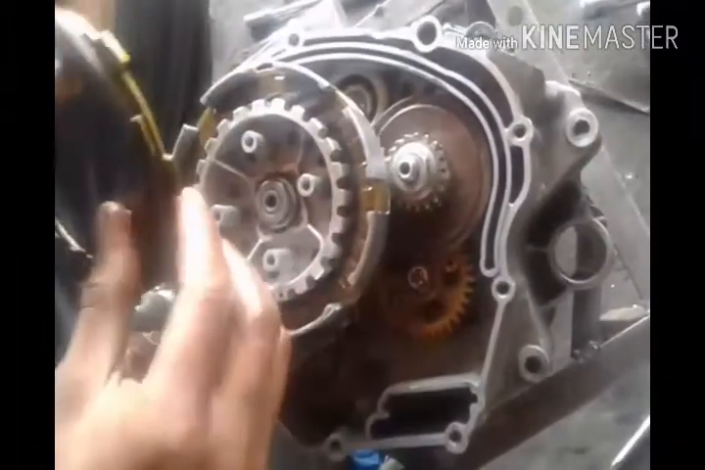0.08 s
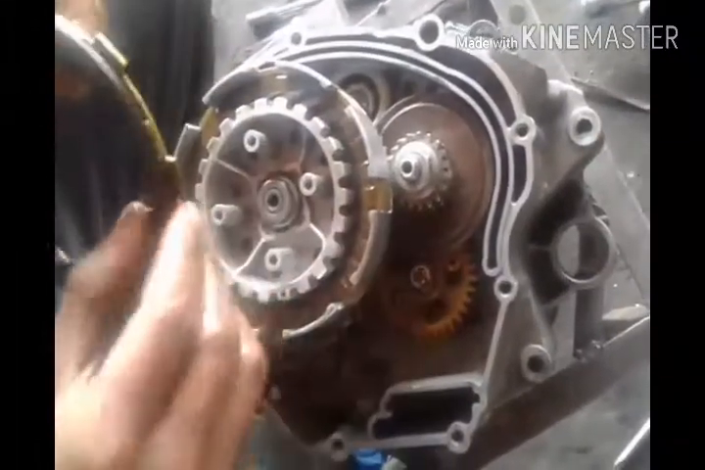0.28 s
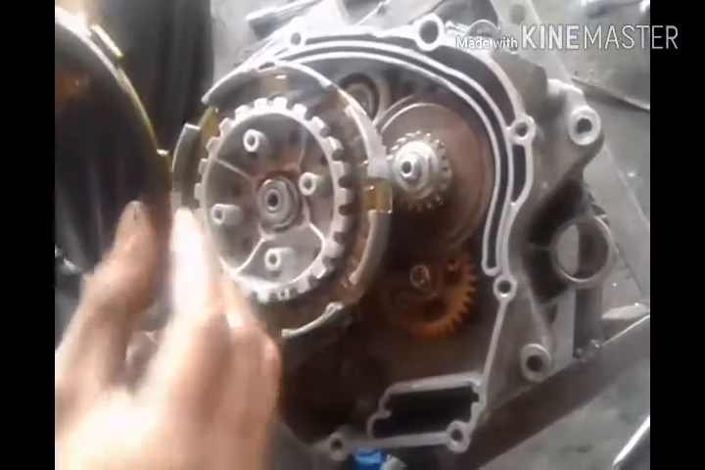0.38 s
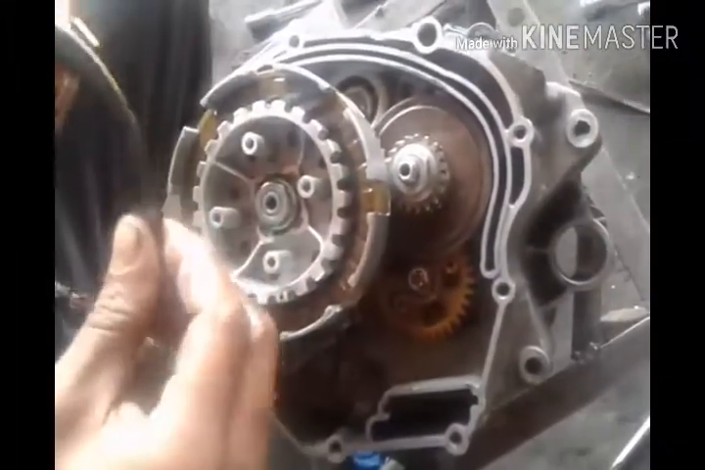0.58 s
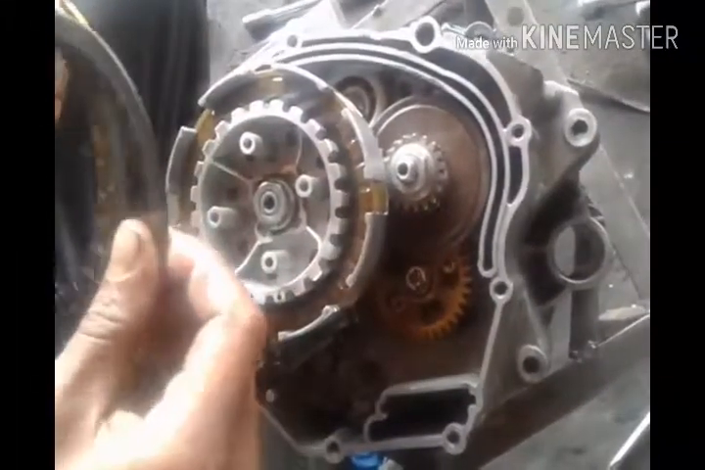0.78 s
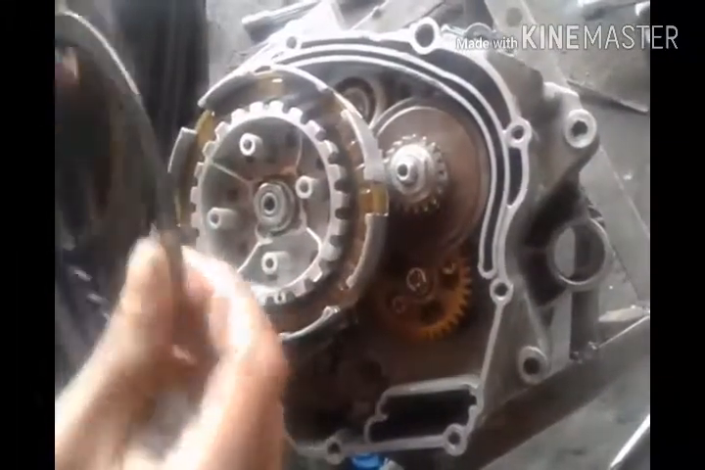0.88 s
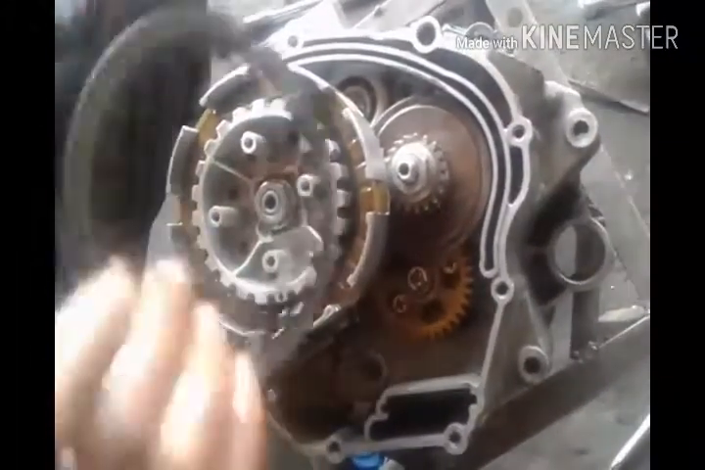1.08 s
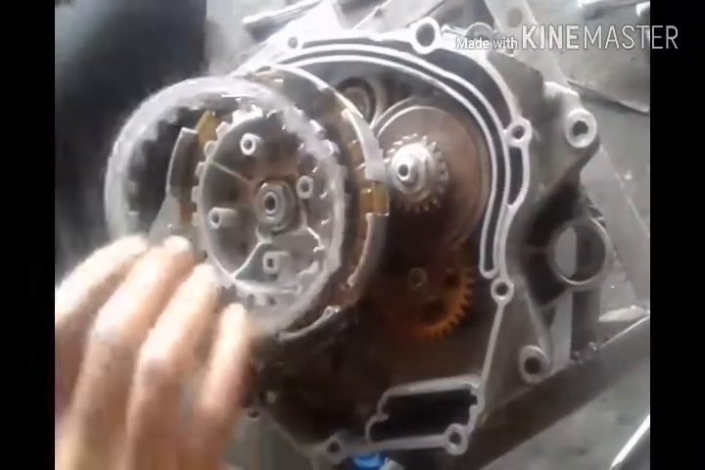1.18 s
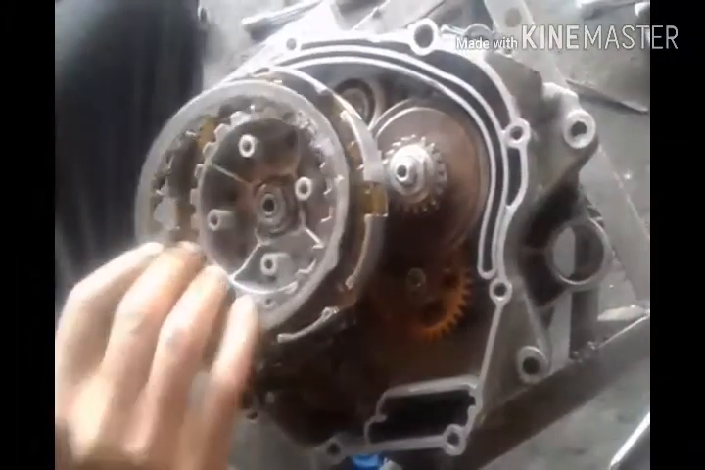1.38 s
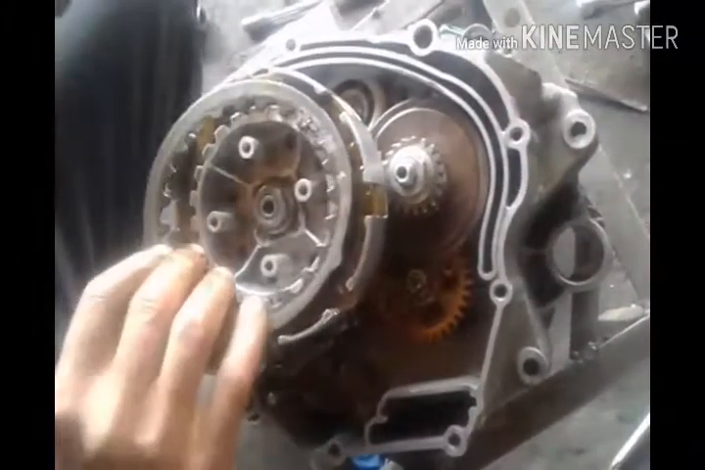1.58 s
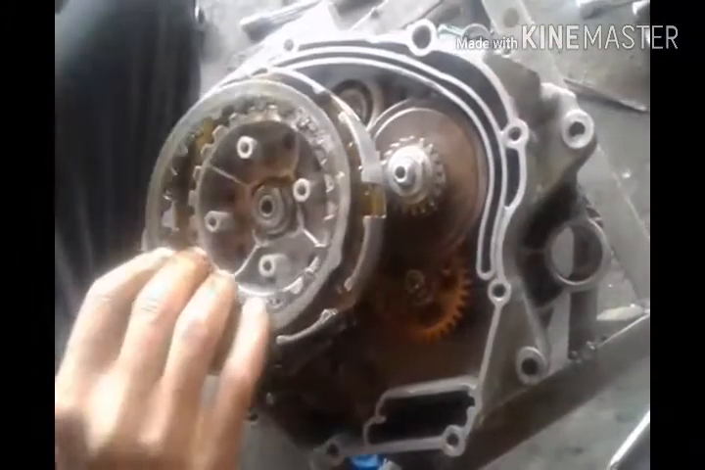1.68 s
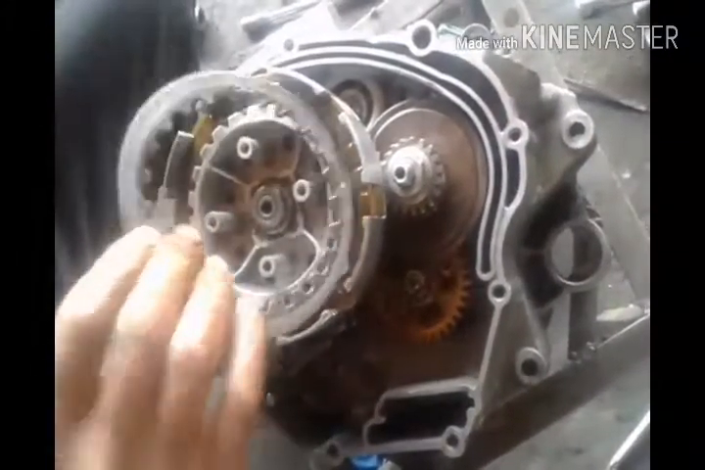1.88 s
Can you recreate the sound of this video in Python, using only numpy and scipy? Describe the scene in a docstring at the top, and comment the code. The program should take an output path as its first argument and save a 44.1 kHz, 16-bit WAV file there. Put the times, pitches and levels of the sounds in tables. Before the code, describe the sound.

Steel plates clink sharply three times and ring briefly in a hard workshop with engine-like rumble

```python
"""A low rumble with engine-like tones is heard first, under a soft hiss of sliding, in a hard-walled workshop.
In front of it steel clutch plates are handled and slid onto an engine: three bright clinks ring on in the room,
with lighter rebounds after them; a faint squeak leads into the last. Rumble, hiss and scuffs are coloured noise;
engine tones, drones, squeak and plate ring are sines; contacts are noise bursts coloured by a click and
followed by dense reflections. At the microphone a gain control ducks loud moments."""
import sys
import numpy as np
from scipy import signal
from scipy.fft import rfft, irfft
from scipy.io import wavfile
from scipy.ndimage import uniform_filter1d

SR = 44100
rng = np.random.default_rng(int(sys.argv[2]) if len(sys.argv) > 2 else 0)


def dump_mix(stems):
    """Bounce the given channels to the path in sys.argv[1] as a 16-bit WAV at rate SR."""
    frames = np.atleast_2d(stems).T  # one column per channel
    limited = np.clip(frames, -1, 1)  # hard clip at full scale
    pcm = np.round(limited * 32767).astype(np.int16)
    wavfile.write(sys.argv[1], SR, pcm)


N = 85995
T = np.arange(N) / SR   # time [s]


def from_db(db):
    """Convert decibels to an amplitude gain."""
    return 10 ** (np.asarray(db) / 20)


def rms_one(x):
    """Scale to unit rms."""
    return x / np.sqrt(np.mean(x ** 2) + 1e-20)


def in_time(rows):
    """Join the rows of a curve by straight lines, one array per column after the time."""
    times_s, *columns = np.transpose(rows)
    return [np.interp(T, times_s, column) for column in columns]


def at_hz(points, hz):
    """Read a spectrum between its points on a log-frequency axis."""
    point_hz, value = np.transpose(points)
    return np.interp(np.log(np.maximum(hz, 1)), np.log(point_hz), value)


def drift(rate_hz):
    """Smooth random wandering of unit rms: white noise through two equal one-pole low-passes."""
    pole = np.exp(-2 * np.pi * rate_hz / SR)
    wander = signal.lfilter([1], [1, -2 * pole, pole * pole], rng.standard_normal(2 * N))
    return rms_one(wander[N:])   # the first half lets the filter settle


def noise(spectrum):
    """Noise of unit rms, coloured by a spectrum."""
    hz = np.fft.rfftfreq(N, 1 / SR)
    white = rfft(rng.standard_normal(N))
    return rms_one(irfft(white * from_db(at_hz(spectrum, hz)), N))


def tone(hz, jitter, waver_db, rate):
    """A sine of about unit rms whose pitch and level waver; jitter is a fraction of the pitch."""
    turns = np.cumsum(hz * (1 + jitter * drift(rate))) / SR + rng.random()
    return np.sqrt(2) * np.sin(2 * np.pi * turns) * from_db(waver_db * drift(rate))


# The engine-like background, before trims:
# (time [s], noise level [dB], firing rate [Hz], level of the tones [dB])
ENGINE_SWELL = [(0, -41, 42.8, -42), (.25, -34, 42.3, -33.5), (.45, -29, 41.74, -28),
                (.57, -26.5, 41.9, -23), (.665, -27, 41.68, -23.5), (.695, -34.5, 41.1, -32),
                (.84, -31.5, 41.76, -28), (.97, -34, 41.58, -32), (1.1, -33, 40.55, -39.5),
                (1.5, -36.5, 39.77, -39.5), (1.95, -35.5, 39, -46)]
# Its tones: (multiple of the firing rate, level [dB])
ENGINE_ORDERS = [(2, -5.5), (3, -13), (4, -15), (5, -14), (7, -13)]
# Colours of the low rumble, the growl above it and the airy rush: (frequency [Hz], relative level [dB per Hz])
RUMBLE_COLOUR = [(28, -38), (48, -19), (66, -1), (100, 0.5), (135, 4.5), (200, -0.5), (260, -8), (400, -25),
                 (800, -67), (3000, -77)]
GROWL_COLOUR = [(120, -42), (210, -4.5), (270, 1.5), (330, -3.5), (430, -11), (700, -16.5), (1500, -43),
                (5000, -60.5)]
RUSH_COLOUR = [(300, -3), (550, -1.5), (800, -1), (1300, -1), (1900, -3.5), (2400, -17.5), (4000, -17.5),
               (7000, -35), (10000, -69)]


def rumble():
    """Engine-like tones sag in pitch as their rumble and rush swell, then recede and grow duller."""
    rumble_trim_db, growl_trim_db, growl_fade_db_per_s = -4, -2.5, 2.5
    rush_peak_db, rush_follows = -34.5, 0.95   # dB of rush per dB of swell
    level_db, firing_hz, tones_db = in_time(ENGINE_SWELL)
    swell_db = level_db - level_db.max()
    tones = sum(from_db(order_db) * tone(round(order) * firing_hz, jitter=0.004, waver_db=1.5, rate=4.55)
                for order, order_db in ENGINE_ORDERS)
    low = from_db(level_db + rumble_trim_db) * noise(RUMBLE_COLOUR)
    growl = from_db(level_db + growl_trim_db - growl_fade_db_per_s * T) * noise(GROWL_COLOUR)
    rush = from_db(rush_peak_db + rush_follows * swell_db) * noise(RUSH_COLOUR)
    return from_db(tones_db) * tones + low + growl + rush


# Low droning tones: (start [s], end [s], start pitch [Hz], end pitch [Hz], level at the middle [dB])
DRONE_TONES = [(.02, .62, 404, 399, -42), (0, .62, 296, 292, -39), (.3, 1.4, 355, 345, -41),
               (.9, 1.75, 173, 168, -41)]


def drones():
    """Low wavering tones in the background fade in, sink a little and fade out."""
    out = 0
    for start_s, end_s, start_hz, end_hz, db in DRONE_TONES:
        part = np.clip((T - start_s) / (end_s - start_s), 0, 1)
        hz = start_hz + (end_hz - start_hz) * part
        fade = np.sin(np.pi * part)
        out = out + from_db(db) * fade * tone(hz, jitter=0.003, waver_db=3.5, rate=5.7)
    return out


# The sliding hiss: (time [s], level [dB])
HISS_LEVEL = [(0, -46), (.12, -43), (.278, -40.5), (.296, -32.5), (.34, -34), (.395, -38.5), (.44, -33),
              (.51, -37), (.65, -31.5), (.695, -43.5), (.87, -39), (.925, -38.5), (1.02, -42), (1.09, -36),
              (1.13, -47.5), (1.33, -45), (1.41, -43), (1.95, -43.5)]
# Colours of the hiss and of the scuffs: (frequency [Hz], relative level [dB per Hz])
HISS_COLOUR = [(1500, -8), (2400, -9), (3200, -3.5), (4200, 1.5), (5200, -7), (6500, -16.5), (8000, -21.5),
               (9300, -47.5), (12000, -64)]
SCUFF_COLOUR = [(300, -11), (600, -3), (1200, -8), (1900, 4), (2600, -13), (4000, 9.5), (6500, -16),
                (11000, -63)]
# The plate scuffs against the hub as it seats: (time of the middle [s], level [dB], half length [s])
HUB_SCUFFS = [(0.947, -40.5, 0.042), (1.164, -29.5, 0.02)]
# The thin squeak: (time [s], level [dB], pitch [Hz])
SQUEAK_GLIDE = [(1.41, -56, 4130), (1.445, -45, 4090), (1.48, -40, 4050), (1.5, -41.5, 4030),
                (1.515, -47, 4005), (1.545, -42, 4070), (1.575, -48, 4060)]


def sliding():
    """Sliding steel: a soft noise hiss, short swells of scuffing noise and one thin, wavering squeak."""
    hiss_db, = in_time(HISS_LEVEL)
    hiss = from_db(hiss_db + 0.56 * drift(6.1)) * noise(HISS_COLOUR)
    scuff_gain = sum(from_db(db) * np.exp(-((T - s) / half_s) ** 2) for s, db, half_s in HUB_SCUFFS)
    squeak_db, squeak_hz = in_time(SQUEAK_GLIDE)
    sounding = (T > SQUEAK_GLIDE[0][0]) & (T < SQUEAK_GLIDE[-1][0])
    squeak = sounding * from_db(squeak_db) * tone(squeak_hz, jitter=.004, waver_db=1.7, rate=80)
    return hiss + scuff_gain * noise(SCUFF_COLOUR) + squeak


# One soft, low bump: (time [s], level [dB], pitch [Hz], t60 [s])
SEATING_BUMP = (0.5, -24.5, 154.5, 0.1)


def bump():
    """One soft, low thud as the plate is seated: a dying sine."""
    s, db, hz, t60 = SEATING_BUMP
    age = np.maximum(T - s, 0)
    return from_db(db - 60 * age / t60) * np.sin(2 * np.pi * hz * age)


# The plate sings briefly as it settles after a clink: (time [s], level [dB], pitch [Hz])
SETTLING_NOTES = [(.752, -27, 3780), (1.186, -18.8, 3985), (1.63, -21.5, 3988)]
# The modes that sing then: (offset from that pitch [Hz], level [dB], t60 [s])
SETTLING_PAIR = [(0, -2.5, .23), (-62, 1.5, .12)]


def settling():
    """A light late touch wakes a close, beating pair of the plate's modes; the upper one lingers."""
    rise_s = 0.0079
    out = 0
    for s, db, hz in SETTLING_NOTES:
        age = np.maximum(T - s, 0)
        pair = sum(from_db(mode_db - 60 * age / t60) * np.sin(2 * np.pi * (hz + offset_hz) * age)
                   for offset_hz, mode_db, t60 in SETTLING_PAIR)
        out = out + from_db(db) * (1 - np.exp(-age / rise_s)) * pair
    return out


# Colour of a steel contact: (frequency [Hz], relative level [dB per Hz])
CONTACT_COLOUR = [(150, -45), (420, -18.5), (590, -13), (760, -21.5), (1800, -29), (2350, -22.5),
                  (2850, -10), (3750, 1.5), (4500, -5.5), (5300, -8.5), (6400, -11.5), (8000, -20),
                  (10800, -30.5), (13500, -29.5)]


def snap(tilt_db, size=2048):
    """A causal click of unit energy in the colour of a contact, tilted in dB per octave above 4 kHz."""
    hz = np.fft.rfftfreq(size, 1 / SR)
    octaves = np.log2(np.maximum(hz / 4000, 1))
    # folding the cepstrum forward gives minimum phase
    cepstrum = irfft(np.log(from_db(at_hz(CONTACT_COLOUR, hz) + tilt_db * octaves)))
    cepstrum[1:size // 2] *= 2
    cepstrum[size // 2 + 1:] = 0
    click = irfft(np.exp(rfft(cepstrum)))
    return click / np.linalg.norm(click)


def burst(t60):
    """A dying spray of tiny impacts with unit energy: white noise under a decay."""
    spray = rng.standard_normal(N) * from_db(np.maximum(-60 * T / t60, -200))
    return spray / np.linalg.norm(spray)


# Decay of the workshop, before the length factor: (frequency [Hz], t60 [s])
WORKSHOP_T60 = [(1000, 0.16), (3400, 0.29), (6000, 0.3), (13000, 0.11)]


def workshop(length, size=22050):
    """Dense reflections of unit energy build up, hold briefly and die at a rate set by their band."""
    build_s, hold_s = 0.0019, 0.011
    t, hz = T[:size], np.fft.rfftfreq(size, 1 / SR)
    white = rfft(rng.standard_normal(size))
    edges_hz = [0, 2000, 4800, 7000, 10000, SR / 2]
    tail = 0
    for low, high in zip(edges_hz, edges_hz[1:]):
        t60 = length * at_hz(WORKSHOP_T60, (low + high) / 2)
        band = irfft(white * (hz >= low) * (hz < high), size)
        tail = tail + band * from_db(-60 * np.maximum(t - hold_s, 0) / t60)
    tail = tail * (1 - np.exp(-t / build_s))
    return np.pad(tail / np.linalg.norm(tail), (0, N - size))


# The plate rebounds against the hub's teeth: (time [s], relative level [dB], treble tilt [dB per octave])
REBOUND_TAPS = [(0.7435, -4.5, 2), (0.7555, -7.5, 0), (0.766, -6.5, -1), (0.7775, -7.5, -1.5),
                (0.7973, -7.5, -5), (1.161, -8, -3.5), (1.168, -3.5, -4.5), (1.1888, -9, -2),
                (1.211, -15, 1), (1.602, -18, -9), (1.634, -10, -11), (1.657, -16, -12)]


def rebounds():
    """Light late taps keep the plate rattling, each with a little room; glancing ones are duller."""
    trim_db, tap_t60_s, room_db = 7.5, 0.038, -2
    taps = np.zeros(N)
    for s, db, tilt_db in REBOUND_TAPS:
        i = int(s * SR)
        tap = burst(tap_t60_s) + from_db(room_db) * workshop(1)
        taps[i:] += from_db(db + trim_db) * signal.fftconvolve(tap, snap(tilt_db))[:N - i]
    return taps


# The three clinks, in front: (time of the main contact [s], relative level [dB],
# treble tilt [dB per octave], plate ring [dB], factor on the contact spacing and room decay)
CLINK_EVENTS = [(0.7069, -2.5, -1, 3.5, 1.01), (1.1269, -3, -2.5, -1.5, 0.98),
                (1.5709, -2.5, -3, -0.5, .95)]
# Contacts within a clink, before that factor: (time after the first touch [s], relative level [dB])
CLINK_CONTACTS = [(0.0, -10.5), (0.0045, -1.5), (0.0075, 3), (0.0121, -7.5), (0.021, -0.5), (0.037, -11.5)]
# Ringing modes of the plate: (frequency [Hz], relative level [dB], t60 [s])
PLATE_MODES = [(3000, 0, 0.21), (3190, -6, 0.3), (3130, -5, 0.32), (3300, -4, 0.23), (3590, -1.5, 0.38),
               (3630, -6.5, 0.56), (3660, -12, 0.29), (3830, -2.5, 0.56), (3830, -17, 0.45),
               (3990, -4, 0.39), (4188, -14, 0.35), (4320, -15, 0.24), (4400, -2.5, 0.39), (4680, -2, 0.39)]


def clink(s, level_db, tilt_db, ring_db, length):
    """A quick run of steel contacts: each cracks, chatters and fills the room, and the plate rings on."""
    lead_s = .0075   # from first touch to main contact, before the length factor
    crack_share, crack_t60_s, chatter_t60_s = 0.79, 0.0053, 0.042
    direct_db, room_db = 8, 10
    rattle_db, rattle_hz = 1.0, 110   # unevenness of the decay
    ring_trim_db, ring_build_s = -23.5, 0.01
    contacts = np.zeros(N)
    for after_s, db in CLINK_CONTACTS:
        i = int((s + (after_s - lead_s) * length) * SR)
        direct = crack_share * burst(crack_t60_s) + burst(chatter_t60_s)
        contact = from_db(direct_db) * direct + from_db(room_db) * workshop(length)
        contacts[i:] += from_db(db) * contact[:N - i]
    age = np.maximum(T - s, 0)
    # the unevenness grows over the first 20 ms
    contacts = contacts * from_db(rattle_db * drift(rattle_hz) * np.minimum(age / .02, 1))
    ring = sum(from_db(ring_trim_db + ring_db + db - 60 * age / t60)
               * np.sin(2 * np.pi * (hz * T + rng.random())) for hz, db, t60 in PLATE_MODES)
    ring = ring * (1 - np.exp(-age / ring_build_s))
    return from_db(level_db) * (signal.fftconvolve(contacts, snap(tilt_db))[:N] + ring)


def scene():
    """Rumble and drones behind, sliding and seating nearer, rebounds and clinks in front; one channel."""
    background = rumble() + drones()
    handling = sliding() + bump() + settling() + rebounds()
    clinks = sum(clink(*row) for row in CLINK_EVENTS)
    return (background + handling + clinks)[None]


def record(dry):
    """Gain control ducks under loud sounds and recovers; peaks are rounded, deep bass and top are cut."""
    limit_db, cut_per_db, recover_db_per_s = -17, 0.57, 76
    peak_top, bass_cut_hz, top_cut_hz = .66, 40, 13850
    level_db = 10 * np.log10(np.maximum(uniform_filter1d(dry[0] ** 2, size=400), 1e-12))
    cut_db = np.maximum(level_db - limit_db, 0) * cut_per_db
    # a cut is released along a straight line in dB
    held_db = np.maximum.accumulate(cut_db + recover_db_per_s * T) - recover_db_per_s * T
    out = dry * from_db(-uniform_filter1d(held_db, size=200))
    out = out / (1 + (out / peak_top) ** 6) ** (1 / 6)
    out = signal.sosfilt(signal.butter(3, bass_cut_hz, "high", fs=SR, output="sos"), out)
    return signal.sosfilt(signal.ellip(10, .2, 70, top_cut_hz, fs=SR, output="sos"), out)


dry = scene()
out = record(dry)
dump_mix(out)
```